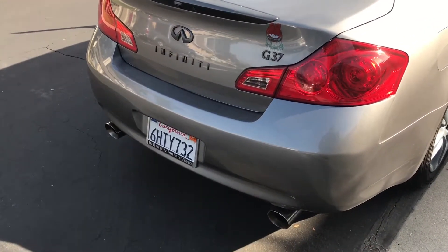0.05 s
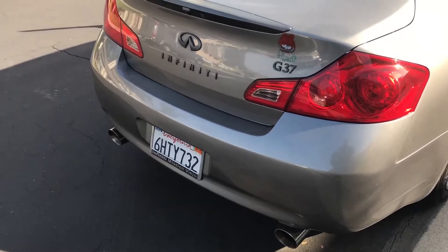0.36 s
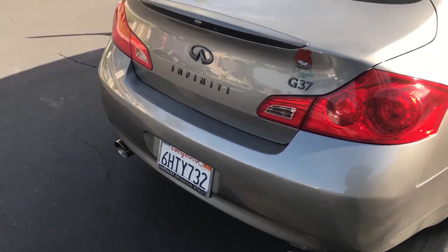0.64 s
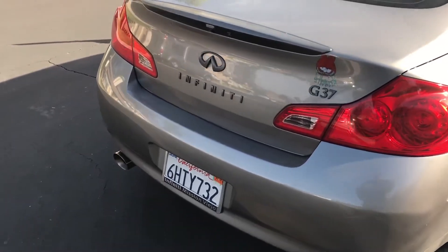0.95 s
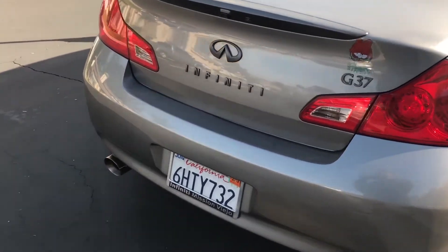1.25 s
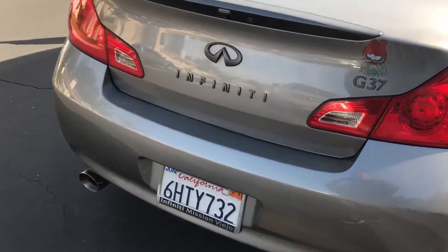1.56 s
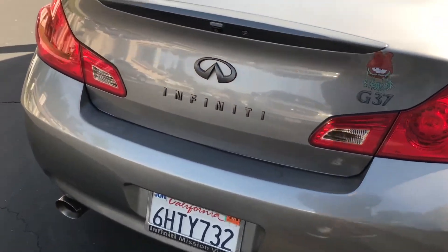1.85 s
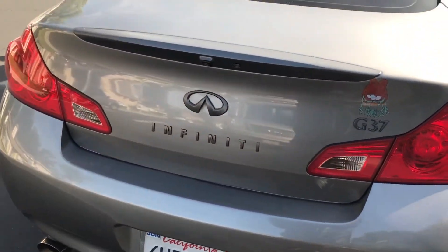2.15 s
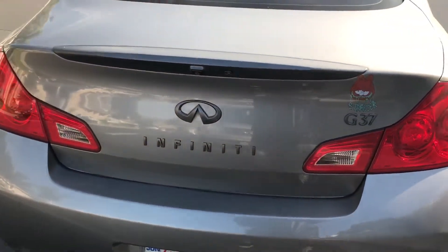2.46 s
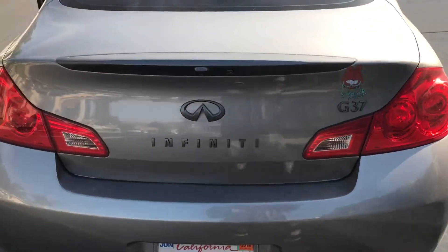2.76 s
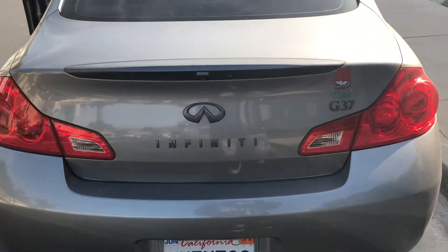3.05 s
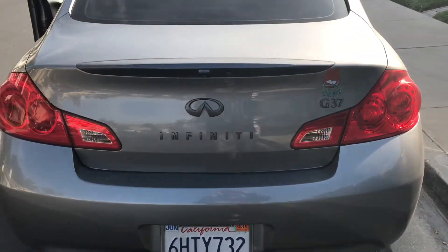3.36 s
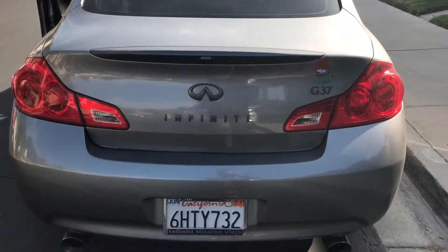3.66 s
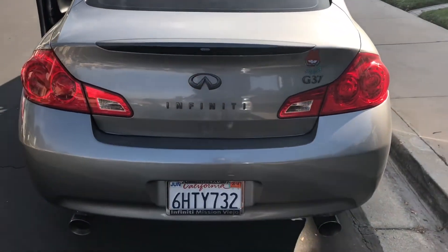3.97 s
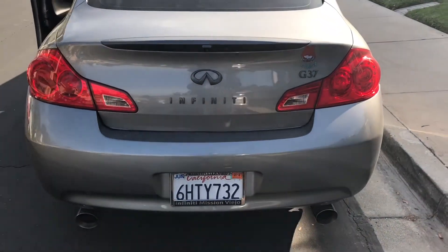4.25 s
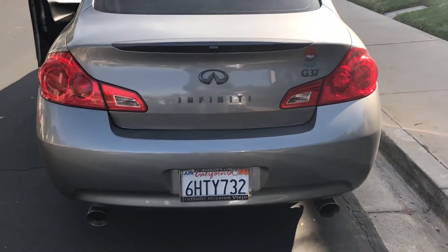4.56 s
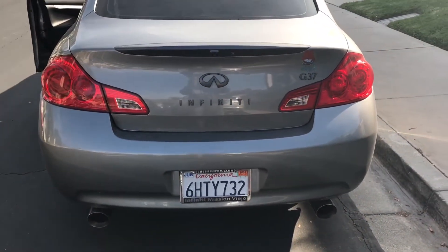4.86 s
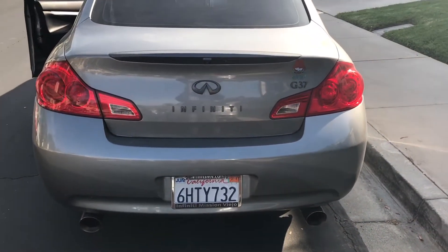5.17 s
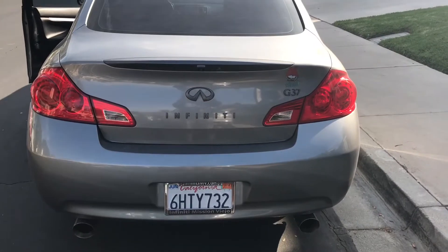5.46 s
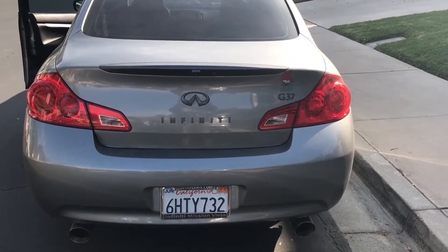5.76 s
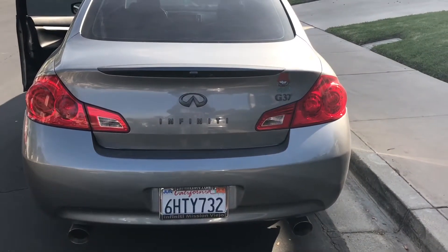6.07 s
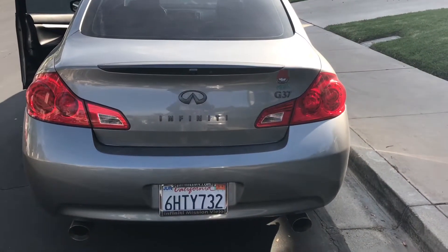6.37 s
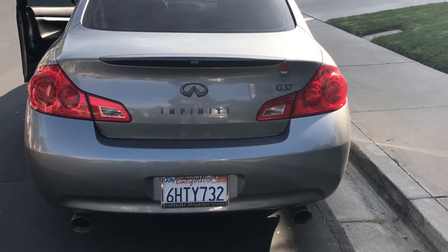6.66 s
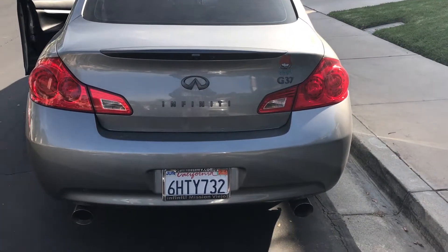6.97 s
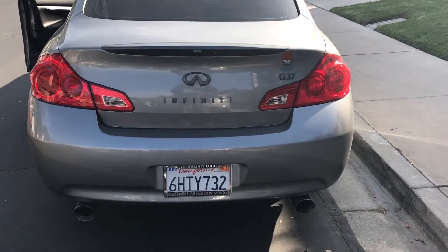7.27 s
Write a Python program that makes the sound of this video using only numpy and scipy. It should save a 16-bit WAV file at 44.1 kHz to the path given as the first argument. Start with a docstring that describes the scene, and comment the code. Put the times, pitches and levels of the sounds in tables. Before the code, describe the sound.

A parked six-cylinder car idles through a loud twin exhaust, a deep throbbing drone with rapid raspy puffs and fine metallic ticking from the tailpipes. The microphone moves from the rear corner close past the bumper, where the sound grows a little fuller and hollower, then stops behind the car. The idle sinks slightly and holds steady over a very faint outdoor street rumble.

```python
"""A six-cylinder car idles through a loud twin exhaust, its speed slowly settling.
Each firing pushes a deep pulse and a rasping puff of gas out of the pipes and sets them ringing;
unequal cylinders make it throb. The microphone moves from the rear corner, close past the bumper,
to a spot behind the car. The asphalt echoes the treble, and the street rumbles faintly."""
import sys
import numpy as np
from scipy import signal
from scipy.fft import rfft, irfft, next_fast_len
from scipy.io import wavfile
from scipy.ndimage import map_coordinates

SR = 44100
rng = np.random.default_rng(int(sys.argv[2]) if len(sys.argv) > 2 else 0)


def log_audio(samples):
    """Write samples as a 16-bit WAV file to the path given in sys.argv[1]."""
    # one column per channel
    frames = np.atleast_2d(samples).T
    # limit to full scale, then quantise
    limited = np.clip(frames, -1, 1)
    pcm = np.round(limited * 32767).astype(np.int16)
    wavfile.write(sys.argv[1], SR, pcm)


N = 322812


def amp(db):
    """Decibels to gain."""
    return 10 ** (np.asarray(db) / 20)


def unit(x):
    """Scale to rms 1."""
    return x / np.sqrt(np.mean(x ** 2) + 1e-20)


def curves(rows):
    """One value per sample for each column after the time."""
    times_s, *columns = np.transpose(rows)
    return [np.interp(np.arange(N) / SR, times_s, column) for column in columns]


def filtered(x, response):
    """x through a frequency response, a function of Hz."""
    size = next_fast_len(N + SR // 2)
    return irfft(rfft(x, size) * response(np.fft.rfftfreq(size, 1 / SR)), size)[:N]


def coloured(x, points):
    """x through a spectrum of (Hz, dB) points on a log axis."""
    hz, db = np.transpose(points)
    return filtered(x, lambda f: amp(np.interp(np.log(f + 1), np.log(hz), db)))


def resonance(f, hz, width_hz):
    """Response of one damped mode."""
    return 1j * f * width_hz / (hz * hz - f * f + 1j * f * width_hz)


def wobble(knots_per_s):
    """Smooth random curve."""
    knots = rng.standard_normal(int(N * knots_per_s / SR) + 4)
    return map_coordinates(knots, [np.arange(N) * knots_per_s / SR])


def swell(pass_s, half_width_s):
    """Inverse-distance gain as the microphone passes a spot."""
    return 1 / np.hypot(1, (np.arange(N) / SR - pass_s) / half_width_s)


# Each row: time in seconds, place (0 corner, 1 close, 2 over the bumper, 3 behind).
WALK = [(0, -0.5), (.85, 0.5), (1.3, 1), (1.85, 1), (2.6, 2), (3.1, 2.5), (4.1, 3), (7.32, 3)]

def mic_place():
    """Microphone position at each sample."""
    return curves(WALK)[0]


def along_walk(values):
    """Glide through one value per place."""
    return np.interp(mic_place(), np.arange(len(values)), values)


# Each row: frequency in Hz, relative density in dB.
STREET_SPECTRUM = [(20, -8), (90, -8.5), (200, -5.5), (500, -22), (1500, -26), (4000, -40.5), (7000, -39.5),
                   (16000, -49.5)]

def street(level_db=-45):
    """Faint, steady neighbourhood rumble."""
    return amp(level_db) * unit(coloured(rng.standard_normal(N), STREET_SPECTRUM))


# Each row: time in seconds, echo delay in ms, gain relative to the direct sound.
GROUND_ECHO = [(0, 1, 0.12), (1.8, 0.91, 0.047), (2.5, 1.278, 0.16), (3.3, 1.07, 0.49), (4, .97, .35),
               (5, 0.95, 0.21), (7.32, 0.88, 0.28)]

def ground_echo(x, above_hz=700):
    """The asphalt's echo cuts treble notches that slide as the microphone moves."""
    delay_ms, gain = curves(GROUND_ECHO)
    treble = filtered(x, lambda f: 1 / (1 + (above_hz / (f + 1)) ** 6))
    echo = map_coordinates(treble, [np.arange(N) - delay_ms * SR / 1000], mode="nearest")
    return x - treble + (treble + gain * echo) / np.hypot(1, gain)


# Each row: pass time in seconds, swell half-width in seconds, pitch in Hz, nominal width in Hz,
# level at the pass in dB.
BUMPER_HOLLOWS = [(1.26, 0.28, 787, 160, -35.5), (2.28, 0.27, 1530, 333, -42.5)]

def hollows(flow):
    """Gas resounds in the gaps under the bumper, heard only from close by."""
    sound = np.zeros(N)
    for pass_s, half_width_s, hz, width_hz, db in BUMPER_HOLLOWS:
        tone = filtered(flow * rng.standard_normal(N), lambda f: resonance(f, hz, 2 * width_hz) ** 2)
        sound += amp(db) * swell(pass_s, half_width_s) ** 2 * unit(tone)
    return sound


# Each row: frequency in Hz, 60 dB decay time in seconds, relative level in dB.
TAILPIPE_MODES = [(2473, 0.038, -2.5), (2640, 0.0084, -2.5), (2836, 0.03, -3.5), (3130, 0.014, 3.5),
                  (3420, 0.016, 0.5)]

def tailpipe_ticks(firings, cylinder_db, lag_periods=0.0997, jitter_periods=0.02, scatter_db=6.0):
    """Each puff jolts the steel tailpipe, which ticks with a new mix of its modes."""
    count = int(firings[-1])
    jolts = np.arange(count) + lag_periods + jitter_periods * rng.standard_normal(count)
    onsets = np.clip(np.searchsorted(firings, jolts), 0, N - 1)
    jolt_db = np.resize(cylinder_db, count) + scatter_db * rng.uniform(-1, 1, count)
    mix = rng.standard_normal((count, len(TAILPIPE_MODES)))
    mix /= np.linalg.norm(mix, axis=1, keepdims=True)  # modes share one jolt's energy
    t = np.arange(SR // 25) / SR
    attack = 1 - np.exp(-t / 0.0013)
    ring = np.zeros(N)
    for share, (hz, t60_s, db) in zip(mix.T, TAILPIPE_MODES):
        mode = np.sin(2 * np.pi * hz * t) * amp(-60 * t / t60_s) * attack
        strikes = np.bincount(onsets, amp(jolt_db + db) * share, N)
        ring += signal.oaconvolve(strikes, mode)[:N]
    return unit(ring)


# Each row: frequency in Hz, width in Hz, relative level in dB.
AIR_COLUMN_MODES = [(598.6, 34, -2), (687, 45, -11), (900, 56, -9), (993.5, 23, -1.5), (1310, 16, -12.5),
                    (1770, 680, -14)]

def pipe_singing(flow, kick=0.38, pass_s=2.11, half_width_s=0.86, pass_db=-39):
    """Puffs keep the pipes' air columns ringing, loudest as the microphone passes the mouth."""
    drive = kick * unit(np.gradient(flow)) + flow * rng.standard_normal(N)
    modes = lambda f: sum(amp(db) * resonance(f, hz, width_hz) for hz, width_hz, db in AIR_COLUMN_MODES)
    band = lambda f: 1 / (1 + (f / 1900) ** 8) / (1 + (530 / (f + 1)) ** 20)
    ring = unit(filtered(drive, lambda f: modes(f) * band(f)))
    return amp(pass_db) * swell(pass_s, half_width_s) * ring


def puffs(firings, cylinder_db, opens, rise, decay, echo_gain, steady, scatter_db, echo_lag=0.38):
    """Gas flow: a burst per firing and its weaker return along the pipe, over a steady stream."""
    # opens, rise, decay and echo_lag are in firing periods
    periods = np.maximum(firings - opens, 0)
    index, age = periods.astype(int), periods % 1
    scatter = np.clip(rng.standard_normal(index[-1] + 1), -1.5, 1.1)
    size = amp(cylinder_db[index % len(cylinder_db)] + scatter_db * scatter[index])
    burst = lambda u: (1 - np.exp(-(np.maximum(u, 0) / rise) ** 2)) * np.exp(-u / decay)
    pulsing = size * np.hypot(burst(age), echo_gain * burst(age - echo_lag))
    return unit(np.hypot(pulsing, steady))


# Gas spectrum at each place. Each row: frequency in Hz, relative density in dB.
GAS_CORNER = [(300, 1.5), (430, -8.5), (510, -13.5), (650, -8), (1100, -7), (1500, -7.5), (1800, -0.5),
              (2100, -10.5), (2600, -3), (3500, -10.5), (3900, -12), (4500, -14), (5000, -20.5),
              (5500, -18), (7000, -32), (8700, -33.5), (11000, -41), (16000, -41.5)]
GAS_CLOSE = [(300, 6), (470, -13), (600, 0), (790, -0.5), (1050, -6), (1300, -8), (1700, -1), (2100, -9),
             (2700, -4), (3500, -9.5), (4500, -14), (5900, -22), (7000, -34), (11000, -38.5), (16000, -42)]
GAS_BUMPER = [(300, 4), (480, -12.5), (600, 6.5), (1000, -15.5), (1300, -20), (1750, -7), (2150, -13),
              (2700, -2.5), (3500, -14), (4500, -14.5), (5800, -21), (7000, -38.5), (11000, -42),
              (16000, -46.5)]
GAS_BEHIND = [(300, 8), (500, -13), (640, 2.5), (1000, -5.5), (1350, -3.5), (1800, -10.5), (2400, -4.5),
              (3200, -10), (3750, -13), (4450, -13.5), (4900, -21), (5600, -19), (7200, -36.5),
              (8500, -34.5), (10700, -38.5), (16000, -37)]

def gas_rush(flow, band):
    """Turbulence driven by the flow, its colour cross-fading from place to place."""
    place = mic_place()
    sound = np.zeros(N)
    for i, spectrum in enumerate((GAS_CORNER, GAS_CLOSE, GAS_BUMPER, GAS_BEHIND)):
        turbulence = coloured(flow * rng.standard_normal(N), spectrum)
        fade = np.sqrt(np.maximum(1 - abs(place - i), 0))
        sound += fade * unit(filtered(turbulence, band))
    return sound


# Standing waves of the whole exhaust. Each row: frequency in Hz, width in Hz,
# relative level beside the car in dB, the same behind it, polarity.
EXHAUST_MODES = [(108.1, 15, -3.5, -4.5, -1), (172.6, 12.9, -5, 6.5, 1), (219.3, 11, -7.5, -1.5, 1),
                 (245.5, 9.1, -8.5, -20.5, 1)]

def throb(firings, push, unevenness=0.1, travel_ms=5.95, muffler_hz=370):
    """Strong and weak cylinders repeat every sixth firing and boom in the pipes."""
    place = mic_place()
    lag_periods = 0.23 - 0.04 * np.clip(place - 2, 0, 1)
    onsets = np.flatnonzero(np.diff(np.floor(firings - lag_periods)))
    count = len(onsets)
    pulses = np.zeros(N)
    pulses[onsets] = np.resize(push - push.mean(), count) + unevenness * rng.standard_normal(count)
    muffler = lambda f: np.exp(-2j * np.pi * f * travel_ms / 1000) / (1 + (f / muffler_hz) ** 6)
    # the two outlets sum differently as the microphone comes between them
    behind = np.clip((place - 1) / 2, 0, 1)
    boom = np.zeros(N)
    for hz, width_hz, beside_db, behind_db, polarity in EXHAUST_MODES:
        wave = filtered(pulses, lambda f: resonance(f, hz, width_hz) * muffler(f))
        boom += polarity * amp(beside_db + behind * (behind_db - beside_db)) * wave
    return unit(boom)


# Drone at each place. Each row: multiple of the firing rate, relative level in dB.
DRONE_CORNER = [(1, 1), (2, 1.5), (3, -4.5), (4, -9), (5, -15.5), (6, -23.5), (7, -21), (8, -50)]
DRONE_CLOSE = [(1, -0.5), (2, 1.5), (3, -5.5), (4, -6), (5, -22), (6, -31.5), (7, -38), (8, -43)]
DRONE_BUMPER = [(1, 2), (2, 4), (3, -5.5), (4, -0.5), (5, -11.5), (6, -17), (7, -31.5), (8, -48)]
DRONE_BEHIND = [(1, -4), (2, 0.5), (3, -11), (4, -2), (5, -16), (6, -19.5), (7, -30), (8, -34.5)]

def drone(firings, bass_lead_cycles=0.72, waver_db=0.37):
    """Clean low orders of the firing rate; the lowest run ahead of the pulse's crest."""
    spectra = [dict(rows) for rows in (DRONE_CORNER, DRONE_CLOSE, DRONE_BUMPER, DRONE_BEHIND)]
    # behind the car both outlets are equally near and the crest comes earlier
    crest_periods = np.interp(mic_place(), [2, 3], [0.2695, 0.2177])
    hum, power = np.zeros(N), np.zeros(N)
    for order in spectra[0]:
        gain = amp(along_walk([spectrum[order] for spectrum in spectra]))
        cycles = order * (firings - crest_periods) + bass_lead_cycles / order ** 1.196
        hum -= gain * amp(waver_db * wobble(25)) * np.cos(2 * np.pi * cycles)
        power += gain ** 2 / 2
    return hum / np.sqrt(power)


# Each row: time in seconds, firings per second.
IDLE_SPEED = [(0.0, 60.72), (0.42, 61.82), (0.93, 61.16), (1.19, 59.14), (2.04, 60.03), (3.45, 56.67),
              (4.47, 56.69), (4.93, 55.92), (6.24, 56.59), (7.32, 56.61)]
# Cylinders in firing order. Each row: extra push as a share, then chuff, rasp and tick offsets in dB.
CYLINDERS = [(0.91, 3.5, 0, 2), (-.02, 2.5, -0.5, -2), (-0.42, -2.5, 2.1, 3.5), (-0.79, -5.5, 1.5, -5.5),
             (0.72, 2, -1.7, 0.5), (-0.041, 2.5, 1.5, -4)]
# Places from corner to behind. Each row: drone, throb, chuff, rasp and tick levels in dB.
PLACE_LEVELS = [(-14.5, -24.5, -28, -36.5, -48.5), (-12.5, -21.5, -35.5, -38.5, -44.5),
                (-13.3, -22.5, -34, -43, -44.5), (-13.5, -28, -33.5, -42, -46.5)]

def exhaust(split_hz=1300):
    """Drone, throb, soft chuff, sharp rasp and ringing pipes, all locked to the firings."""
    firings = np.cumsum(curves(IDLE_SPEED)[0]) / SR
    push, chuff_offsets_db, rasp_offsets_db, tick_offsets_db = np.transpose(CYLINDERS)
    drone_db, throb_db, chuff_db, rasp_db, tick_db = map(along_walk, np.transpose(PLACE_LEVELS))
    lowpass = lambda f: 1 / np.sqrt(1 + (f / split_hz) ** 8)
    highpass = lambda f: np.sqrt(1 - lowpass(f) ** 2)
    chuff_flow = puffs(firings, chuff_offsets_db, opens=0.038, rise=0.072, decay=0.21,
                       echo_gain=0.4, steady=0.27, scatter_db=0.5)
    rasp_flow = puffs(firings, rasp_offsets_db, opens=0.023, rise=0.067, decay=0.23,
                      echo_gain=0.41, steady=0.22, scatter_db=4.5)
    boom = amp(throb_db) * throb(firings, push)
    chuff = amp(chuff_db) * gas_rush(chuff_flow, lowpass)
    rasp = amp(rasp_db) * gas_rush(rasp_flow, highpass)
    ticks = amp(tick_db) * tailpipe_ticks(firings, tick_offsets_db)
    hum = amp(drone_db) * drone(firings)
    return hum + boom + chuff + rasp + ticks + pipe_singing(chuff_flow) + hollows(chuff_flow)


def scene():
    """The idling car with its ground echo, over the street; mono."""
    return (ground_echo(exhaust()) + street())[None]


def record(dry, top_hz=15800):
    """Cut everything above the band limit."""
    return np.array([filtered(x, lambda f: f < top_hz) for x in dry])


dry = scene()
out = record(dry)
log_audio(out)
```